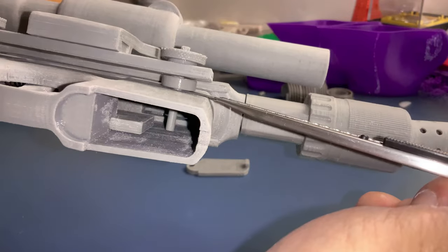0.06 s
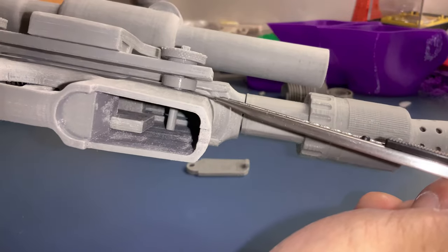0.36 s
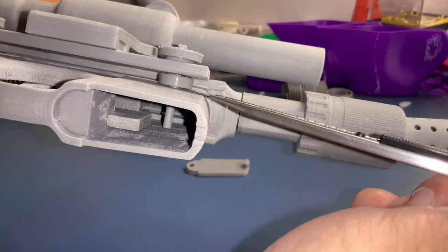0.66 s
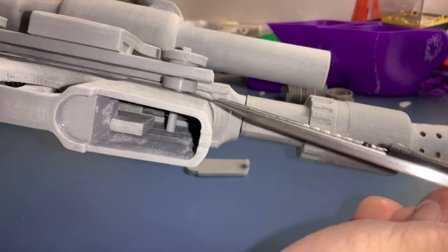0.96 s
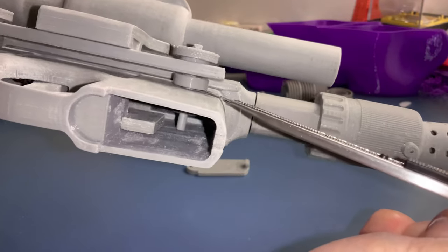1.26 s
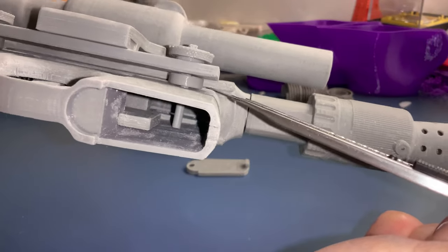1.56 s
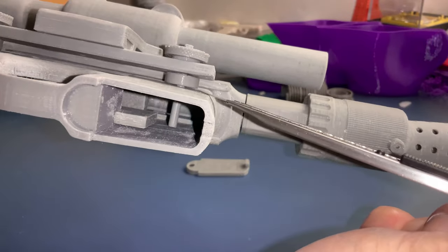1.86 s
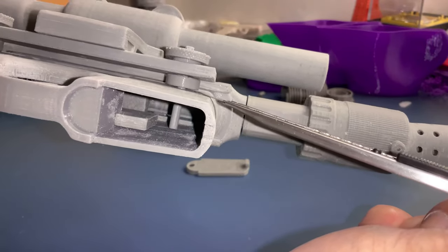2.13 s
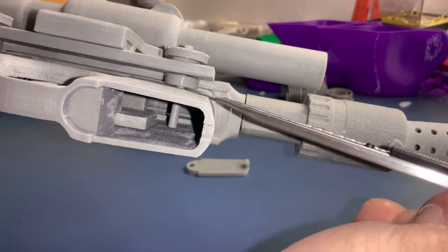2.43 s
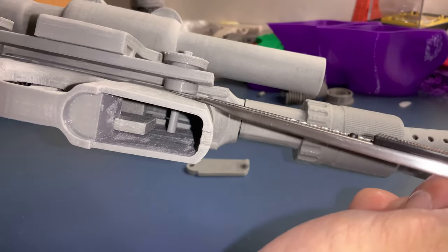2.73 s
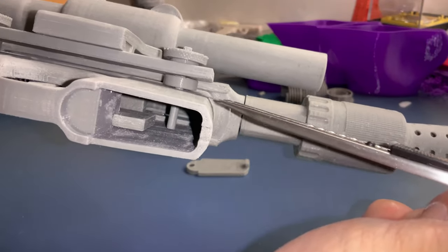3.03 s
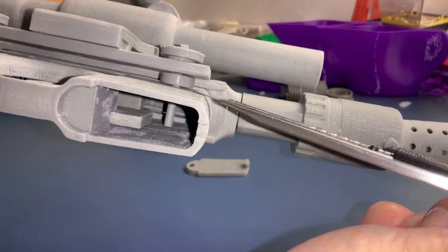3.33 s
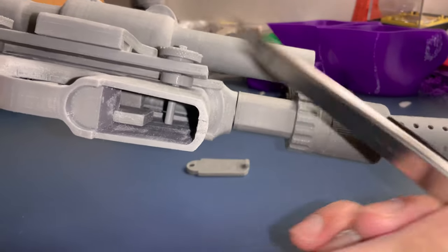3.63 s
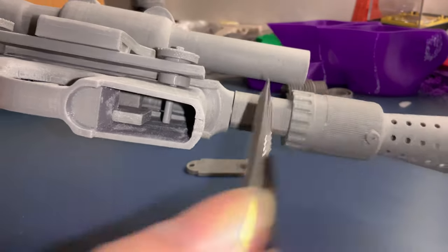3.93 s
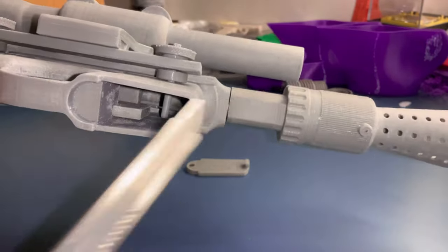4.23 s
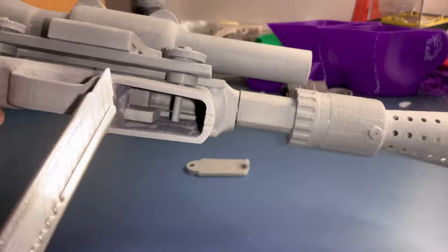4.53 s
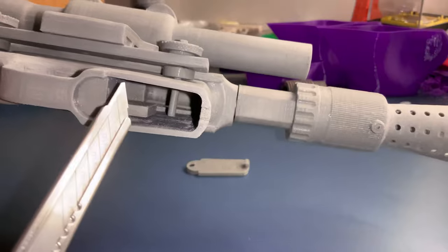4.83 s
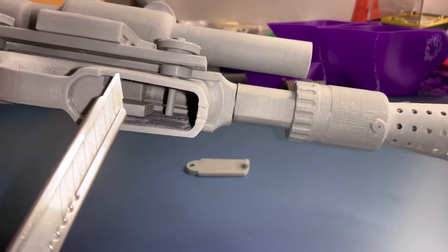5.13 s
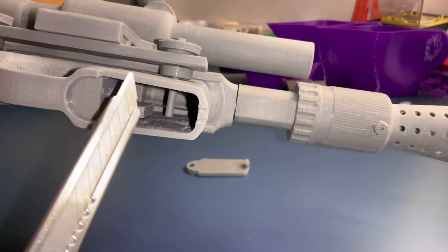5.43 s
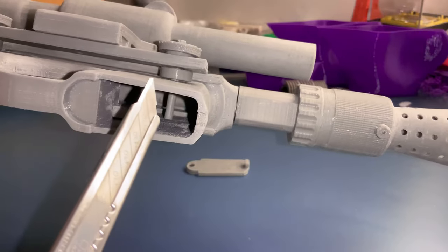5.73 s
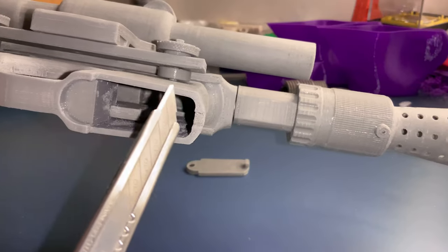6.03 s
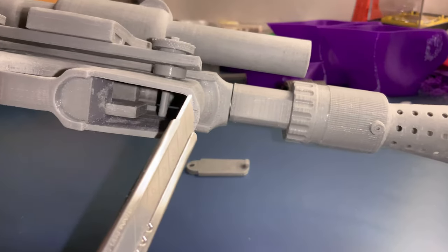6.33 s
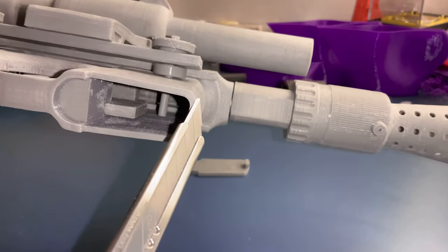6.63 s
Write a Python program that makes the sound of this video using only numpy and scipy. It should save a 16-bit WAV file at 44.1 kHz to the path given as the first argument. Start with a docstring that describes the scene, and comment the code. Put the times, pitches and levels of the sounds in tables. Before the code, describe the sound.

A snap-off knife blade scrapes and ticks against a hollow plastic model, close by, over a faint ventilation hum.

```python
"""Short scrapes and ticks, close by in a humming room: a snap-off knife trims a hollow plastic model.
The blade drags, sticks and slips, and each little jolt rings the plastic shell and the steel.
Midway a hand hisses round the handle to turn the knife, which clicks once; then the scraping goes
on at a new angle. The table and the room echo faintly, over rumbling ventilation and a fan."""
import sys
import numpy as np
from scipy import signal
from scipy.fft import rfft, irfft, next_fast_len
from scipy.io import wavfile
from scipy.ndimage import uniform_filter1d

SR = 44100
rng = np.random.default_rng(int(sys.argv[2]) if len(sys.argv) > 2 else 0)


def to_wav(sig):
    """Store sig (one row per channel, or 1-D mono) as 16-bit WAV at the path in sys.argv[1].

    Samples outside -1..1 are clipped; the rate is SR.
    """
    pcm = np.clip(np.atleast_2d(sig), -1, 1) * 32767
    pcm = np.round(pcm).astype(np.int16)
    wavfile.write(sys.argv[1], SR, pcm.T)  # frames by channels


N = 298981
TIME = np.arange(N) / SR

# knife strokes: t/s of full pressure, rise/s, hold/s, fall/s, blade level/dB, shell over blade/dB,
# edge over blade/dB, share of chatter (0-1), pitch ratio of the shell
STROKES = [ (0.348, 0.073, 0.022, 0.048, -84, 7, -4, .2, 1.05),
           (0.408, 0.016, .008, 0.025, -82, 6, -9, 0.4, 0.9),
           (0.654, 0.018, .012, .05, -79.5, 4, -1, 0.6, 1.05),
           (0.827, 0.029, 0.013, 0.037, -82.5, 10, -3, 0.4, 0.88),
           (1.045, 0.071, 0.02, 0.026, -73.5, 2.5, -5, 0.15, 1.07),
           (1.174, 0.067, 0.039, 0.033, -86, 9.5, 2, .2, 0.94),
           (1.261, 0.0099, 0.016, 0.051, -73.5, -3, -5, 0.3, 1.06),
           (1.345, 0.069, .008, 0.048, -68, 5, -1.5, 0.6, 1.025),
           (1.842, .007, 0.0065, .04, -79, 7, -12, .1, 0.96),
           (2.354, .08, 0.031, 0.066, -78.5, -6, -9, 0.3, 1.2),
           (2.511, 0.061, 0.025, 0.066, -63.5, 8.5, -5.5, 0.33, 1),
           (2.8, 0.066, .085, 0.085, -70.5, 4, -5, 0.03, 1.02),
           (2.995, 0.042, 0.015, 0.023, -57.5, 2.5, -1, 0.1, 1.044),
           (3.041, .02, 0.032, 0.047, -67.5, -10, -1.5, .02, 0.86),
           (3.336, 0.032, 0.009, 0.016, -63, -10, -7, 0.15, 1.1),
           (5.106, 0.0086, 0.0062, 0.05, -70.5, 2.5, -5, 0.8, 1.02),
           (5.268, .025, 0.015, 0.021, -68, 1.5, 4, 0.45, 0.97),
           (5.319, 0.016, .005, 0.034, -70, 4, -2, 0.8, 1.07),
           (5.552, 0.025, 0.055, 0.033, -65.5, 4.5, 0.5, 0.8, 1.024),
           (5.761, 0.033, 0.0083, 0.015, -65.5, -0.5, -1, 0.8, 0.98),
           (5.826, .022, 0.084, 0.061, -60.5, 3, -0.5, 0.77, 1.005),
           (6.495, .03, .015, 0.054, -80, -2, -2, 0.3, 1.03),
           (6.697, .012, 0.018, 0.054, -75, 3, -1.5, 0.7, 1.06), ]


def scraping():
    """Dragging and slipping ring the plastic, whose pitch shifts with each stroke, and the steel."""
    # ringing notes of each part: f/Hz, width/Hz, level/dB at the first, second and third cutting spot
    shell_modes = [(865, 240, -42, -10.5, -31), (1293, 92, -39, -12, 2.5), (1570, 133, -40, -1, -19),
                   (1932, 164, -14, -9, 1), (2096, 100, -10, 5.5, 10), (2215, 295, 5.5, -6.5, -5),
                   (2717, 360, -10, -17, -29), (2908, 316, -2.5, -7, -6.5)]
    blade_modes = [(3190, 240, -1, 0, -7), (3570, 205, -3, -4, 2.5), (4000, 1000, -17, -1, -20),
                   (4940, 210, 3.5, 3.5, -13), (5160, 270, -3, -6.5, 7.5), (5790, 320, 2, -4, 9),
                   (6100, 310, -4, 4, -7), (6700, 450, -27, -3, -5.5), (8100, 400, -3, -6, 1)]
    edge_modes = [(10470, 1000, -11.5, -12, -13), (11280, 810, -2, -0.5, -3), (12100, 600, -1, -10, 8.5),
                  (12900, 1900, -14, 4, -15), (14120, 500, 8, -5, 0.5)]
    force = drag(grains_per_s=6000, spread_db=2.5, judder_db=3.0, judder_hz=152)
    shell, blade, edge = force + slips(crumble=1.8, crumble_s=0.0008)
    pitches = np.array(STROKES)[:, -1]
    steady = np.ones(len(STROKES))
    plastic = ring_strokes(shell, shell_modes, pitches)
    return plastic + ring_strokes(blade, blade_modes, steady) + ring_strokes(edge, edge_modes, steady)


def drag(grains_per_s, spread_db, judder_db, judder_hz):
    """Tiny cracks, bunched by the shaking edge, mix with chatter to push on shell, blade and edge."""
    sizes = from_db(spread_db * np.minimum(rng.exponential(1, N), 4)) * rng.choice([-1, 1], N)
    judder = from_db(judder_db * noise(lambda hz: 1 / (1 + (hz / judder_hz) ** 4)))
    grains = unit_power(sizes * (rng.random(N) < grains_per_s / SR) * judder)
    skips = chatter(slips_per_s=118, jitter=.17, spread_db=1.8, crumble=1.8, crumble_s=0.0007)
    force = np.zeros((3, N))
    for s, rise_s, hold_s, fall_s, db, shell_rel, edge_rel, share, _ in STROKES:
        at, shape = pressure(s, rise_s, hold_s, fall_s, fade_db=20)
        friction = np.sqrt(1 - share) * grains[at] + np.sqrt(share) * skips[:, at]
        force[:, at] += from_db([[db + shell_rel], [db], [db + edge_rel]]) * shape * friction
    return force


def pressure(s, rise_s, hold_s, fall_s, fade_db):
    """The push of one stroke swells by fade_db over its rise, holds, and drops as much over its fall."""
    early = np.maximum(s - TIME, 0) / rise_s
    late = np.maximum(TIME - s - hold_s, 0) / fall_s
    fade = early + late
    active = np.flatnonzero(fade < 2)
    return active, from_db(-fade_db * fade[active])


def chatter(slips_per_s, jitter, spread_db, crumble, crumble_s):
    """The edge sticks and slips in a loose rhythm, kicking shell, blade and edge differently each time."""
    draws = rng.standard_normal((1200, 5))   # per slip: gap, overall strength, strength on each part
    at = (np.cumsum(np.exp(jitter * draws[:, 0])) / slips_per_s * SR).astype(int)
    force = np.zeros((3, N + SR))
    kicks = [snap(crumble, crumble_s) for _ in at]
    for start, kick, (_, shared, *own) in zip(at[at < N], kicks, draws):
        strengths = from_db(spread_db * (shared + np.array(own)))
        force[:, start:start + len(kick)] += strengths[:, None] * kick
    return unit_power(force[:, :N])


def slips(crumble, crumble_s):
    """The edge catches hard and lets go with a tick that kicks shell, blade and edge."""
    # hard catches: t/s, blade level/dB, shell over blade/dB, edge over blade/dB
    catches = [(0.6596, -48, 3, 2), (1.0428, -53, 0, 8), (1.2024, -53.5, 8, 9), (1.2642, -42.5, -2, -16),
               (1.2788, -53.5, 15.5, -6), (1.348, -33.5, -4, -15), (1.3857, -35, -11, 4),
               (2.4926, -33, 0, -7), (2.5195, -39.5, 11, -12), (2.7944, -48, 11, -2),
               (2.9103, -30, 5, -6.5), (3.014, -18.5, -2.5, -12.5), (5.1114, -45.5, 3, 9.5),
               (5.2634, -34, -8, -3), (5.3075, -38, -8, 0), (5.3202, -28, -22, 0.5),
               (5.3268, -33, -1.5, 2.5), (5.5248, -38.5, 5, -4), (5.5985, -31.5, -0.5, 0.5),
               (5.635, -51.5, 3, 12), (5.7122, -42.5, 7, 1), (5.8249, -31.5, -15, 1.5),
               (5.8465, -33.5, 8, 1), (5.9454, -37, 5.5, -1), (5.9712, -43, 6.5, -2),
               (6.6922, -46.5, 2, -4)]
    force = np.zeros((3, N + SR))
    for s, db, shell_rel, edge_rel in catches:
        kick, at = snap(crumble, crumble_s), round(s * SR)
        force[:, at:at + len(kick)] += from_db([[db + shell_rel], [db], [db + edge_rel]]) * kick
    return force[:, :N]


def snap(crumble, crumble_s):
    """One sharp jolt, then a short crumbling; crumble says how strong that is next to the jolt."""
    t = TIME[:SR // 30]
    tail = rng.standard_normal(len(t)) * t * np.exp(-t / crumble_s)
    force = crumble * tail / np.linalg.norm(tail)
    force[0] += 1
    return force / np.linalg.norm(force)


def ring_strokes(force, modes, pitches):
    """Ring a part stroke by stroke; each cutting spot brings out its own mix of the part's notes."""
    s, _, hold_s, *_ = np.transpose(STROKES)
    spots = np.searchsorted([2.1, 4.0], s)   # the knife moves to a new spot at these two times (s)
    midpoints_s = (s[:-1] + hold_s[:-1] + s[1:]) / 2
    borders = [0, *(midpoints_s * SR).astype(int), N]
    out = np.zeros(N + SR)
    for spot, pitch, start, end in zip(spots, pitches, borders, borders[1:]):
        ring = resonate(force[start:end], [(hz * pitch, width, dbs[spot]) for hz, width, *dbs in modes])
        out[start:start + len(ring)] += ring
    return out[:N]


def resonate(force, modes):
    """A pushed object rings at its own notes (modes); the wider a mode, the sooner it dies away."""
    t = TIME[:SR // 16]
    ring = 0
    for hz, width, db in modes:
        damping = np.pi * width / np.sqrt(np.sqrt(2) - 1)
        envelope = damping ** 2 * t * np.exp(-damping * t)
        ring = ring + from_db(db) * envelope * np.cos(2 * np.pi * hz * t)
    return signal.oaconvolve(force, ring / np.linalg.norm(ring))[:N]


def holder_click():
    """The loose blade knocks once in its metal holder."""
    # the knock: t/s, level/dB
    knock = [(3.6855, -18)]
    # ringing notes of the holder: f/Hz, width/Hz, level/dB
    holder_modes = [(3460, 75, -2), (3850, 160, -16), (4020, 170, 6), (5070, 110, 2), (5460, 270, 7),
                    (6940, 460, -10), (7700, 370, 2.5), (11500, 1400, -19), (14100, 880, -7)]
    return struck(knock, holder_modes, crumble=0.59)


def blade_twangs():
    """The blade springs free and twangs."""
    # moments it springs free: t/s, level/dB
    twangs = [(1.3857, -28.5), (5.3085, -40), (5.3273, -32)]
    # ringing notes of the free blade: f/Hz, width/Hz, level/dB
    free_modes = [(3460, 36, -1.5), (4855, 180, 8.5), (7920, 140, -5)]
    return struck(twangs, free_modes, crumble=0.24)


def struck(blows, modes, crumble):
    """Short blows set a metal part ringing."""
    force = np.zeros(N)
    for s, db in blows:
        kick, at = snap(crumble, crumble_s=0.00065), round(s * SR)
        force[at:at + len(kick)] += from_db(db) * kick
    return resonate(force, modes)


def sliding_hand(level_db, flutter_db, left_db, shared):
    """Skin slides over handle and mat: a wide, smooth hiss that flutters a little with the grip."""
    # loudness of the slide: t/s, palm level/dB, finger level/dB, sizzle level/dB
    slide = [(3.47, -90, -95, -95), (3.562, -80, -64, -66), (3.694, -83, -56, -55.5),
             (3.708, -79, -64, -57), (3.922, -82, -78, -70), (4.118, -78, -80, -71),
             (4.282, -73, -81.5, -81), (4.352, -74.5, -80, -81), (4.388, -85, -95, -101),
             (4.42, -85, -99, -105)]
    # tone colours of the low, middle and high hiss of skin: f/Hz, level/dB
    palm = [(500, -10), (800, 8), (1300, -0.5), (2400, -4), (3300, -4.5), (5000, -4.5), (8000, -36)]
    fingers = [(1800, -19), (2500, -11.5), (3100, -0.5), (4000, -4.5), (5200, 3), (7000, 2), (8600, -5),
               (10500, -20), (13000, -34)]
    sizzle = [(7000, -17.5), (9300, -3.5), (11000, -3), (13000, 0), (15700, -1.5), (17000, -18)]
    s, *levels = np.transpose(slide)
    gains = [from_db(np.interp(TIME, s, db, left=-200, right=-200)) for db in levels]
    grip = from_db(level_db + flutter_db * noise(lambda hz: 1 / (1 + (hz / 45) ** 2)))

    def hiss():
        return sum(gain * coloured(colour) for gain, colour in zip(gains, (palm, fingers, sizzle)))
    right = hiss()
    left = from_db(left_db) * (np.sqrt(shared) * right + np.sqrt(1 - shared) * hiss())
    return grip * np.array([left, right])


def reflections(x, decay_s, build_s):
    """Dense echoes, different on each side, build up and then fade by 60 dB in decay_s."""
    t = TIME[:SR // 2]
    envelope = from_db(-60 * t / decay_s) * (1 - np.exp(-(t / build_s) ** 2))
    echoes = rng.standard_normal((2, len(t))) * envelope
    echoes /= np.linalg.norm(echoes, axis=1, keepdims=True)
    return signal.oaconvolve(x[None], echoes, axes=1)[:, :N]


def ventilation(level_db):
    """Moving air rumbles, alike on both sides in the bass; standing waves tip some pitches to one side."""
    # tone colour of the air: f/Hz, level/dB
    colour = [(15, -9.5), (28, -6), (38, -1), (50, -2.5), (72, -3), (100, 1), (140, -10), (240, -5.5),
              (330, -17.5), (500, -24.5), (750, -30.5), (1000, -40), (1600, -49.5), (3800, -52),
              (7000, -49), (10000, -53), (15000, -53.5), (16000, -53)]
    # how alike left and right are: f/Hz, correlation (1 = the same)
    likeness = [(30, .995), (100, 0.91), (250, 0.75), (450, 0.64), (650, 0.09), (1100, 0.37), (2000, 0.11),
                (4000, 0.054), (8000, 0.14)]
    # lean to one side: f/Hz, left minus right level/dB
    balance = [(50, 1.5), (100, -2.5), (190, -5.5), (270, -1), (450, -7), (700, 3.5), (1200, -1),
               (7000, -1.5), (10000, 3)]

    def common(hz):
        return from_db(at_hz(colour, hz)) * np.sqrt(1 + at_hz(likeness, hz))

    def opposed(hz):
        return from_db(at_hz(colour, hz)) * np.sqrt(1 - at_hz(likeness, hz))
    side_gain = np.linalg.norm(opposed(frequencies(N))) / np.linalg.norm(common(frequencies(N)))
    air = from_db(level_db) * (noise(common) + side_gain * noise(opposed) * np.array([[1], [-1]]))
    size = next_fast_len(N, True)
    lean_db = at_hz(balance, frequencies(size))
    return irfft(rfft(air, size) * from_db([lean_db / 2, -lean_db / 2]), size)[:, :N]


def fan_hum(steady_s):
    """A fan's tones waver and flutter, but keep their level over spans longer than steady_s."""
    # tones of the fan: f/Hz, width/Hz, level/dB
    tones = [(56.96, 6.6, -49.5), (89.9, 7.7, -60.5), (104.1, 5.3, -62), (116, 8.2, -73.5), (178, 2.9, -62),
             (198.13, 13, -55), (364.5, 17, -77), (535.4, 3.6, -86.5), (784.7, 13, -84)]
    hum = np.zeros(N)
    for hz, width, db in tones:
        tone = noise(lambda f: 1 / (1 + (2 * (f - hz) / width) ** 2))
        power = uniform_filter1d(tone ** 2, int(steady_s * SR))
        hum += from_db(db) * tone / np.sqrt(power + 1e-6)
    return hum * from_db([[-.6], [.6]])   # a little louder on the right


def from_db(db):
    """Turn decibels into a number to multiply by."""
    return 10 ** (np.asarray(db) / 20)


def unit_power(x):
    """Scale a sound to an average power of one."""
    return x / np.sqrt(np.mean(x ** 2) + 1e-30)


def frequencies(size):
    """The frequency of each slot in a spectrum, 1 Hz at least."""
    return np.maximum(np.arange(size // 2 + 1) * SR / size, 1)


def at_hz(points, hz):
    """Read between a table's rows, with octaves evenly spaced."""
    f, value = np.transpose(points)
    return np.interp(np.log(hz), np.log(f), value)


def noise(gain_at):
    """Noise of power one, shaped by a gain for each frequency."""
    size = next_fast_len(N, True)
    spectrum = rfft(rng.standard_normal(size)) * gain_at(frequencies(size))
    return unit_power(irfft(spectrum, size)[:N])


def coloured(points):
    """Noise with the tone colour given in a table."""
    return noise(lambda hz: from_db(at_hz(points, hz)))


def delayed(x, seconds):
    """The same sound a little later."""
    return np.pad(x, (round(seconds * SR), 0))[:N]


def crossover(low, high, split_hz):
    """Join the lows of one sound to the highs of another."""
    size = next_fast_len(N + SR // 10, True)
    below = 1 / (1 + (frequencies(size) / split_hz) ** 30)
    return irfft(np.sqrt(below) * rfft(low, size) + np.sqrt(1 - below) * rfft(high, size), size)[:N]


def scene():
    """The knife works on the right; table clutter and the room answer faintly over air and fan."""
    knife = scraping() + holder_click() + blade_twangs()
    # the knife's low notes arrive on both sides together; its higher ones reach the left slightly later
    left = from_db(-8) * crossover(knife, delayed(knife, seconds=.00091), split_hz=1950)
    table = from_db(-7) * reflections(knife, decay_s=.025, build_s=0.0031)
    room = from_db(-15) * reflections(knife, decay_s=0.2, build_s=0.0064)
    hand = sliding_hand(level_db=1.0, flutter_db=1.0, left_db=-3, shared=0.15)
    background = ventilation(level_db=-51.5) + fan_hum(steady_s=0.31)
    return np.array([left, knife]) + table + room + hand + background


def record(dry):
    """Both sides share the right side's high treble, late and flipped on the left; the very top is cut."""
    left, right = dry
    left = crossover(left, -delayed(right, seconds=.000657), split_hz=9000)
    cutoff_hz = 15750
    return signal.sosfilt(signal.ellip(12, .1, 70, cutoff_hz, fs=SR, output="sos"), [left, right])


dry = scene()
out = record(dry)
to_wav(out)
```